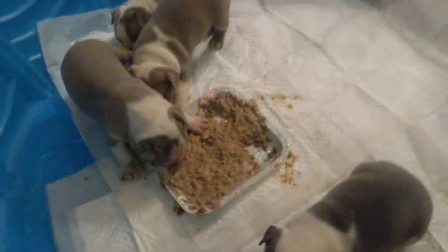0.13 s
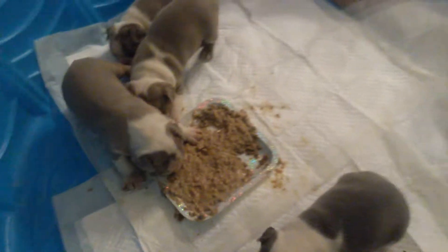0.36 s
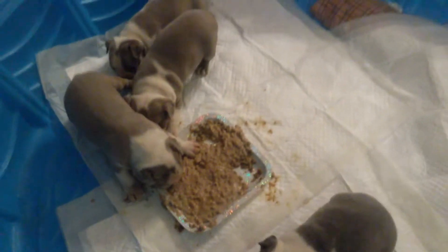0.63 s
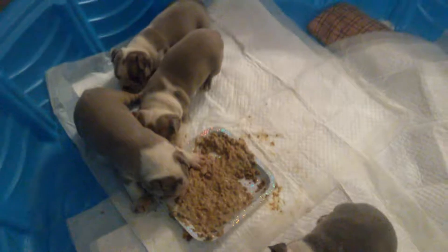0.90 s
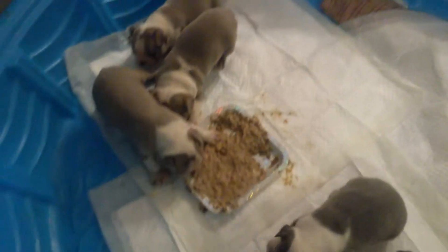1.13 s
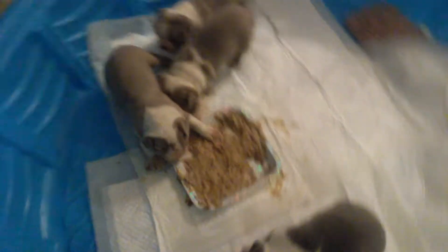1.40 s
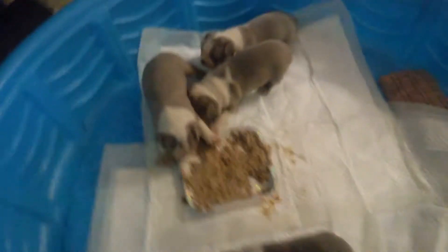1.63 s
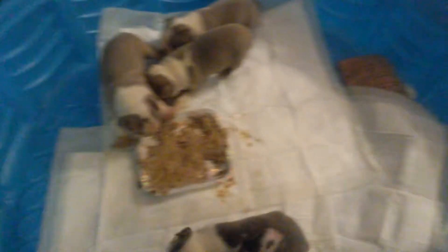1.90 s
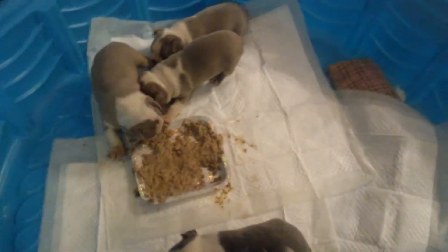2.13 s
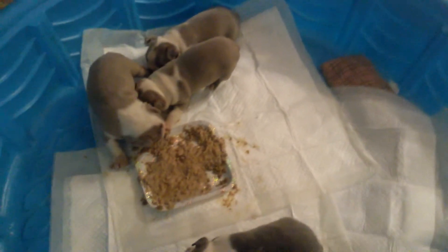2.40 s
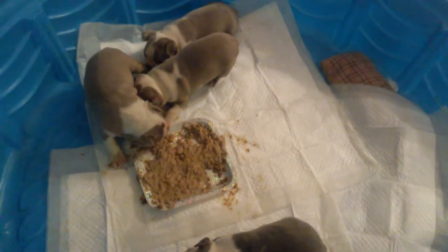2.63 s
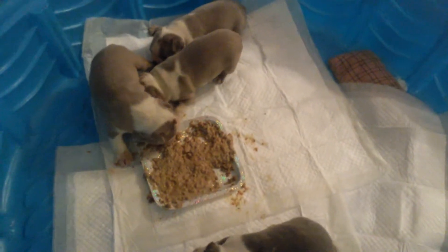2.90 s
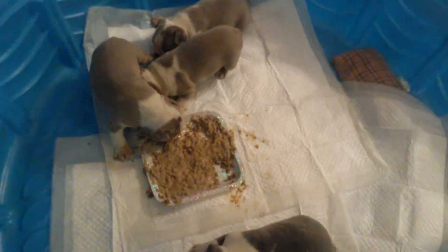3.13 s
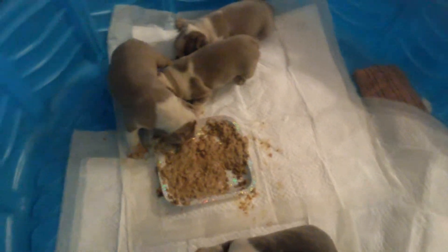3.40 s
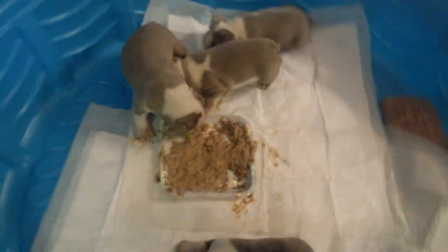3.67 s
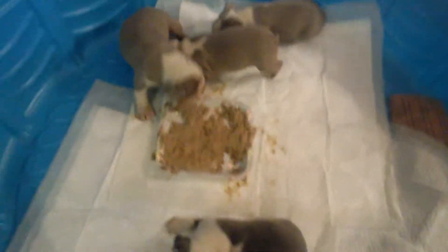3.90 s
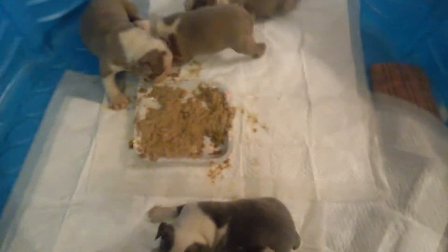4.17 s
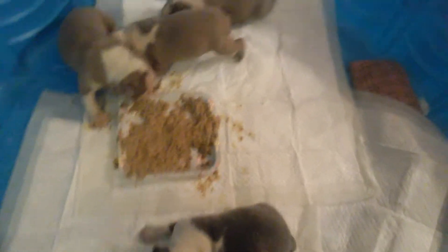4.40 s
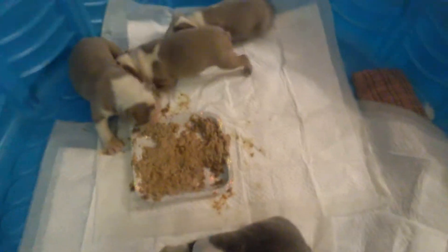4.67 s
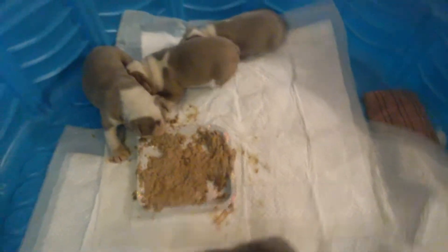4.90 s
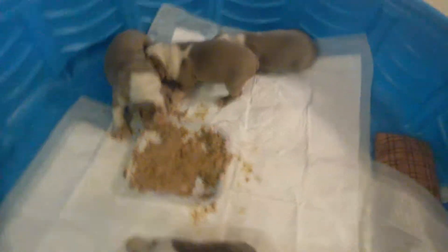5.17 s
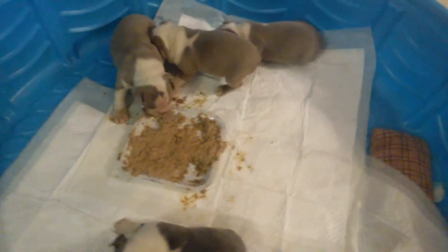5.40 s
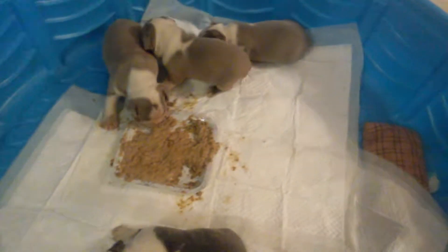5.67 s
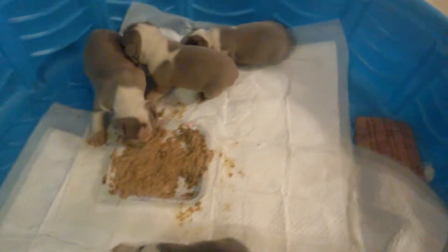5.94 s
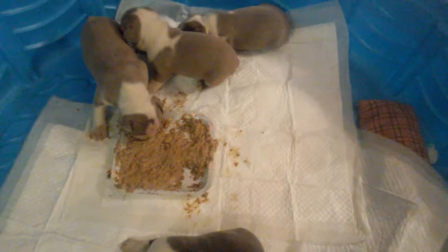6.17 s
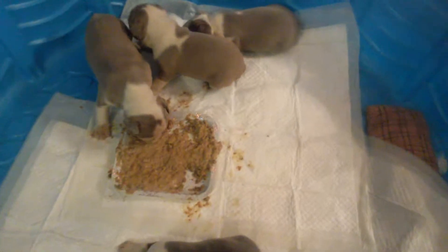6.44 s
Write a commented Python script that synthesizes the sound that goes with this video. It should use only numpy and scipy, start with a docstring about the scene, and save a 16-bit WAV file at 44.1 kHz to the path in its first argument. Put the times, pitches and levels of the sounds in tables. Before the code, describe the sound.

Quick plaintive puppy whimpers and one sharper yelp ring lightly indoors over low hum, soft shuffling, tiny eating clicks and occasional paw thuds.

```python
"""Young puppies round a food tray in a plastic pen, in a bare room, close below a hand-held camera's two ports.
From the start: low room hum, shuffling, thin hiss and a faint steady tick, all shaped noise or wavering tones;
tongue clicks and lip smacks are short ringing bursts, then paws thud on the floor as decaying low swings.
From half a second come whimpers, gliding harmonic tones smeared by the room: plain ones, a yelp with
a second pup over it, round arches and a held whine, more plain ones, wavering cries, and faint last calls."""
import sys
import numpy as np
from scipy import signal
from scipy.fft import rfft, irfft, next_fast_len
from scipy.io import wavfile
from scipy.ndimage import uniform_filter1d, map_coordinates

SR = 44100
rng = np.random.default_rng(int(sys.argv[2]) if len(sys.argv) > 2 else 0)


def convert_level_to_amplitude(level_db):
    """Map a level in decibels to its linear amplitude factor."""
    exponent = np.asarray(level_db, float) / 20
    return 10 ** exponent


def file_out(sig):
    """Save sig as 16-bit WAV at sys.argv[1]."""
    # one column per channel
    cols = np.atleast_2d(sig).T
    # limit, then scale
    lim = np.clip(cols, -1, 1)
    pcm = np.round(lim * 32767).astype(np.int16)
    wavfile.write(sys.argv[1], SR, pcm)


N = 288855


def unit(x):
    """Scaled to rms 1."""
    return x / np.sqrt(np.mean(x ** 2) + 1e-20)


def along(points, hz):
    """Reads (freq_hz, value) points on a log frequency axis."""
    f, v = np.transpose(points)
    return np.interp(np.log(hz + 1), np.log(f + 1), v)


def wobble(rate, size=N):
    """A smooth random curve, rate knots a second."""
    knots = rng.standard_normal(int(size * rate / SR) + 4)
    return map_coordinates(knots, [np.arange(size) * rate / SR])


def filtered(x, response):
    """x times a complex response of frequency."""
    m = next_fast_len(N + SR // 2)
    spectrum = rfft(x, m) * response(np.fft.rfftfreq(m, 1 / SR))
    return irfft(spectrum, m)[..., :N]


def add(track, sound, s):
    """Mixes a sound into a track at time s."""
    part = track[..., round(s * SR):][..., :sound.shape[-1]]
    part += sound[..., :part.shape[-1]]


# Likeness of the noise at the two ports: freq_hz, correlation
PORT_LIKENESS = [(60, 0.92), (240, 0.73), (950, 0.36), (3770, -0.14), (15000, 0.0039)]


def rush(spectrum, patchy_db):
    """Stereo noise of rms 1 with patches of random gain in time and frequency."""
    z = signal.stft(rng.standard_normal((2, N)), nperseg=512)[2]
    field = uniform_filter1d(rng.standard_normal(z.shape[1:]), 6, 0)
    field = uniform_filter1d(field, 14, 1)
    pair = signal.istft(z * convert_level_to_amplitude(patchy_db * unit(field)), nperseg=512)[1][:, :N]

    def response(hz):
        # the angle between mid and side sets how alike the ports are
        turn = np.arccos(np.clip(along(PORT_LIKENESS, hz), -1, 1)) / 2
        return convert_level_to_amplitude(along(spectrum, hz)) * np.array([np.cos(turn), np.sin(turn)])

    mid, side = filtered(pair, response)
    return unit(np.array([mid + side, mid - side]))


# Decay of the bare room: freq_hz, t60_s
ROOM_DECAY = [(200, 0.31), (1000, 0.47), (1800, 0.51), (3000, .45), (8000, 0.44), (15000, 0.13)]


def room(x, length=.6):
    """Each frequency of the reverberation dies at its own speed; the two ports share much of it."""
    hz, t, z = signal.stft(rng.standard_normal((2, round(length * SR))), SR, nperseg=256)
    decay = convert_level_to_amplitude(-60 * t / along(ROOM_DECAY, hz)[:, None])
    shared, apart = signal.istft(z * decay, SR, nperseg=256)[1]
    tail = np.array([shared + .7 * apart, shared - .7 * apart])
    late = np.pad(x, (260, 0))[None]  # 260 samples before the tail begins
    return signal.fftconvolve(late, tail / np.linalg.norm(tail[0]), axes=1)


# Background levels, higher around the calls: start_s, hum_db, shuffle_db
BACKGROUND_LEVELS = [(0.0, -67, -77.5), (0.151, -63, -71.5), (0.64, -64, -77.5), (0.909, -64, -77),
                     (1.31, -55, -64), (1.518, -59.5, -66), (1.701, -53.5, -59.5), (1.88, -56, -63.5),
                     (2.15, -56.5, -62.5), (2.37, -59, -60), (2.6, -59, -70), (2.83, -56, -69.5),
                     (3.3, -57, -66.5), (3.67, -58, -66), (3.81, -58.5, -62.5), (4.081, -52, -59.5),
                     (4.41, -59, -65.5), (4.74, -58.5, -66), (5.099, -66.5, -80.5), (5.33, -59, -67.5),
                     (5.55, -66.5, -81), (5.72, -60, -71.5), (5.821, -61.5, -75.5), (6.04, -66.5, -81.5),
                     (6.55, -66, -84.5)]


def background_levels():
    """Hum and shuffle levels in dB, gliding from point to point."""
    s, *columns = np.transpose(BACKGROUND_LEVELS)
    return [np.interp(np.arange(N) / SR, s, column) for column in columns]


# Spectrum of the room hum: freq_hz, relative level_db per Hz
HUM_SPECTRUM = [(20, -27.5), (40, -5), (60, 1.5), (150, -7.5), (230, -8.5), (390, -13), (530, -13),
                (720, -24), (1200, -47.5)]
# Wavering tones in the hum: pitch_hz, level_db (peak, at the mean hum level)
HUM_TONES = [(53.8, -70), (118.4, -67), (177.6, -71)]


def room_hum(hum_db):
    """Low noise with unsteady level, and tones whose level and phase waver."""
    hum = convert_level_to_amplitude(hum_db + 1.4 * wobble(6) + 2.3 * wobble(25)) * rush(HUM_SPECTRUM, patchy_db=0.5)
    t = np.arange(N) / SR
    for hz, db in HUM_TONES:
        level = convert_level_to_amplitude(db + hum_db - hum_db.mean() + 2.8 * wobble(28.0))
        hum += level * np.sin(2 * np.pi * hz * t + 1.4 * wobble(7.0))
    return hum


# Spectrum of bodies moving on the pads: freq_hz, relative level_db per Hz
SHUFFLE_SPECTRUM = [(400, -23), (700, -4), (1200, -1), (1600, -7), (2300, -2.5), (3500, -10), (5000, -12),
                    (7000, -23.5), (9000, -47.5)]


def shuffling(shuffle_db):
    """Bodies shuffle on the pads: patchy noise with a fluttering level."""
    shuffle = convert_level_to_amplitude(shuffle_db + 1.9 * wobble(27)) * rush(SHUFFLE_SPECTRUM, patchy_db=2.0)
    return shuffle * convert_level_to_amplitude(1.6 * wobble(240))  # crinkling pads break the rustle into grains


# Spectrum of the thin hiss: freq_hz, relative level_db per Hz
HISS_SPECTRUM = [(3000, -26), (5500, -3), (7500, -1), (9300, -13), (11500, -5), (15800, -6.5)]


def thin_hiss(shuffle_db):
    """Patchy treble noise that swings wider than the shuffle."""
    hiss_db = -83.5 + 1.3 * (shuffle_db - shuffle_db.mean())
    return convert_level_to_amplitude(hiss_db) * rush(HISS_SPECTRUM, patchy_db=3.0)


def background():
    """Hum, shuffling and hiss, each at its moving level."""
    hum_db, shuffle_db = background_levels()
    return room_hum(hum_db) + shuffling(shuffle_db) + thin_hiss(shuffle_db)


def ticks(db=-74):
    """A faint treble tick at a steady pace: differenced noise under a short smooth window."""
    size, period_s = 70, .1025  # size in samples
    out = np.zeros((2, N))
    for s in np.arange(.06, N / SR, period_s):
        treble = np.diff(rng.standard_normal((2, size + 1)))
        add(out, convert_level_to_amplitude(db + rng.normal(0, 1)) * np.hanning(size) * treble, s)
    return out


def nibbling(count=70, base_db=-72):
    """Tiny scattered clicks of tongues in wet food, each a fast-dying sine."""
    out, t = np.zeros((2, N)), np.arange(SR // 200) / SR
    s, _, shuffle_db = np.transpose(BACKGROUND_LEVELS)
    for when, pitch, size, pan in rng.uniform(size=(count, 4)):
        start_s = when * N / SR
        # louder where the background swells
        swell_db = .4 * (np.interp(start_s, s, shuffle_db) - shuffle_db.mean())
        click = convert_level_to_amplitude(-60 * t / 0.0031) * np.sin(2 * np.pi * 1800 * 3 ** pitch * t)
        size_db = -7.9 * np.log(.12 + size)  # mostly faint, a few loud
        pan_db = np.array([[-6 * pan], [0]])
        add(out, convert_level_to_amplitude(base_db + swell_db + size_db + pan_db) * click, start_s)
    return out


# Lips smacking close to the ports: start_s, peak_db (before panning), pitch_hz, left_minus_right_db
LIP_SMACKS = [(0.114, -58, 2860, -11), (0.2512, -47.5, 2900, -19), (0.2626, -59, 2850, -23),
              (0.5921, -58, 2730, -14), (1.432, -51, 2570, -16), (2.1798, -37, 1980, -6),
              (2.666, -49, 2210, -15), (3.352, -51, 5500, -4), (3.869, -48.5, 4400, -7),
              (4.7716, -45.5, 2640, -10), (5.676, -50, 2062, -9.5), (6.4076, -61, 3070, -7.5),
              (6.4383, -56.5, 2940, -17)]


def smacks(wet_db=-8):
    """Wet lips part: a short crackle that rings the mouth."""
    out, t = np.zeros((2, N)), np.arange(SR // 30) / SR
    for s, db, hz, pan_db in LIP_SMACKS:
        crackle = rng.standard_normal(len(t)) * convert_level_to_amplitude(-60 * t / 0.0097)
        mouth = t * convert_level_to_amplitude(-60 * t / .0013) * np.sin(2 * np.pi * hz * t)
        ring = np.convolve(crackle, mouth)[:len(t)]
        smack = convert_level_to_amplitude(db) * ring / np.max(np.abs(ring))
        add(out, smack * convert_level_to_amplitude([[pan_db / 2], [-pan_db / 2]]), s)
        add(out, convert_level_to_amplitude(wet_db) * room(smack), s)
    return out


# Paws on the pen floor: start_s, push_db (before onset and panning), pitch_hz, t60_s
PAW_THUDS = [(0.186, -42.5, 97, 0.092), (0.414, -25.5, 169, 0.012), (0.422, -34.5, 113, 0.025),
             (1.992, -25, 193, 0.027), (2.879, -22.5, 299, 0.019), (4.601, -28, 170.3, 0.068),
             (5.088, -42, 176.6, 0.049)]
# Claw taps on the same floor: start_s, peak_db
CLAW_TAPS = [(.4165, -45), (.4237, -48)]


def thuds(wet_db=-9):
    """A paw pushes the thin floor, which swings a few low cycles; claws tap as single short pulses."""
    out, t = np.zeros((2, N)), np.arange(SR // 4) / SR
    for s, db, hz, t60 in PAW_THUDS:
        swing = np.sin(2 * np.pi * hz * t)
        swing += 0.14 * np.sin(2 * np.pi * 2.4 * hz * t + rng.uniform(0, 2 * np.pi))
        thud = convert_level_to_amplitude(db - 60 * t / t60) * (1 - np.exp(-t / 0.0032)) * swing
        add(out, thud * convert_level_to_amplitude([[-1.5], [1.5]]), s)  # a little to the right
        add(out, convert_level_to_amplitude(wet_db) * room(thud), s)
    for s, db in CLAW_TAPS:
        add(out, -convert_level_to_amplitude(db) * np.exp(-((t - .0006) / .00018) ** 2 / 2), s)
    return out


def plain_glide(start, length, start_hz, crest_hz, db):
    """Time, pitch, level, fundamental's dip and mouth opening of a plain whimper.

    A short one is a single glide from start to crest pitch; a longer one also falls after the crest."""
    t = np.arange(0, length, 1 / SR)
    hold_s = .012  # the pitch waits before gliding
    crest = min(.074, length)  # a short call ends at its crest
    up = np.sin(np.pi / 2 * np.clip((t - hold_s) / (crest - hold_s), 0, 1)) ** 1.5
    down = (np.clip(t - crest, 0, 1) / max(length - crest, 1 / SR)) ** 1.8  # the fall starts slowly
    fall_to = .72  # last pitch over crest pitch
    hz = start_hz + (crest_hz - start_hz) * up - (1 - fall_to) * crest_hz * down
    soft_start_db = -10.5 * np.exp(-t / 0.017)
    gasp_db = 8.5 * np.exp((t - length) / 0.0053)  # a last push as the breath stops
    dip_db = -15.5 * np.exp(-((t - .076) / 0.011) ** 2)  # the fundamental sinks near the crest
    return start + t, hz, db + soft_start_db + gasp_db, dip_db, 0 * t


def free_cry(rows):
    """The same controls for a freer pitch path; overtones follow a smoothed level, not the quick dips."""
    s, *columns = np.transpose(rows)
    t = np.arange(s[0], s[-1], 1 / SR)
    hz, db, opening = [uniform_filter1d(np.interp(t, s, c), size=221, mode="nearest") for c in columns]
    smooth_db = uniform_filter1d(db, size=1800, mode="nearest")
    return t, hz, smooth_db, db - smooth_db, np.clip(opening, 0, 1)


# Second harmonic with the mouth closed: freq_hz, level_db over the voice
SECOND_HARMONIC = [(1600, -14.5), (1900, -15), (2200, -14), (2500, -17), (2900, -16)]
# Third harmonic with the mouth not wide open: freq_hz, level_db over the second
THIRD_HARMONIC = [(2200, -4), (2800, -12), (3400, -30), (4000, -30), (4400, -20)]
# Upper harmonics grow as the pitch rises: pitch_hz, level_db over the voice
PITCH_BRIGHTNESS = [(800, -38.5), (950, -39.5), (1150, -27.5), (1290, -22.5), (1380, -20.5), (1500, -13)]
# Colour of the upper harmonics through the nose: freq_hz, relative level_db
NOSE_COLOUR = [(2000, -11.5), (3500, -12.5), (4600, -29), (5300, -38), (5900, -28), (6500, -12.5),
               (7800, -10), (9200, -32.5), (11000, -11.5), (12600, -30), (15500, -37.5)]
# Colour of the upper harmonics through an open mouth: freq_hz, relative level_db
MOUTH_COLOUR = [(2000, -25.5), (4200, -5), (5700, 3.5), (7100, -2.5), (8600, -15), (10000, -22),
                (11500, -17), (15500, -31)]


def whimper(t, hz, db, dip_db, opening, jitter=.004, shimmer_db=1, breath_db=-25, rise=.003, fall=.007):
    """Vocal folds sound harmonics of the pitch; nose and opening mouth colour them."""
    size = len(t)
    hz = hz * (1 + jitter * wobble(90, size))
    k = np.arange(1, 19)[:, None]  # harmonic numbers
    second_db = along(SECOND_HARMONIC, 2 * hz) + 3 * wobble(90, size)
    second_db += 14.5 * np.sin(np.pi / 2 * np.clip(3 * opening, 0, 1))
    upper_db = along(PITCH_BRIGHTNESS, hz) + 23 * opening
    mouth = np.clip(2 * opening - 1, 0, 1)  # from nose to mouth colour
    upper = convert_level_to_amplitude((1 - mouth) * along(NOSE_COLOUR, k * hz) + mouth * along(MOUTH_COLOUR, k * hz))
    upper *= k * hz < SR / 2.6
    gains = upper * convert_level_to_amplitude(upper_db) / np.sqrt(np.sum(upper[3:10] ** 2, axis=0))
    gains[0], gains[1] = convert_level_to_amplitude(dip_db), convert_level_to_amplitude(second_db)
    third = convert_level_to_amplitude(second_db + along(THIRD_HARMONIC, k[2] * hz))
    gains[2] = mouth * gains[2] + (1 - mouth) * third
    gains *= convert_level_to_amplitude(shimmer_db * np.sqrt(k) * np.array([wobble(110, size) for _ in k]))
    phase = 2 * np.pi * np.cumsum(hz) / SR
    tone = np.sqrt(2) * np.sum(gains * np.sin(k * phase + 0.15 * k ** 2), axis=0)
    # turbulent air roughens every harmonic a little
    tone *= 1 + convert_level_to_amplitude(breath_db) * wobble(900, size)
    # the voice rasps more as the breath runs out
    spent = (t - t[0]) / (t[-1] - t[0])
    tone *= convert_level_to_amplitude(1.6 * spent ** 2 * wobble(260, size))
    edges = np.clip((t - t[0]) / rise, 0, 1) * np.clip((t[-1] - t) / fall, 0, 1)
    return convert_level_to_amplitude(db) * edges * tone


# Shading of the direct sound: freq_hz, left_minus_right_db
BODY_SHADING = [(200, 0.5), (700, 1), (1300, -5.5), (2400, -5), (6000, -2.5), (14000, 5.5)]
# Lead of the left port over the right: freq_hz, phase_rad
LEFT_LEAD = [(300, .1), (900, .5), (1400, 1.0), (2400, 1.4), (5500, 1.8), (9000, 1.6), (14000, 1.9)]


def ports(x):
    """Direct sound reaches the left port first and is shaded by the camera body."""
    side = np.array([[.5], [-.5]])

    def response(hz):
        return convert_level_to_amplitude(side * along(BODY_SHADING, hz)) * np.exp(1j * side * along(LEFT_LEAD, hz))

    return filtered(x, response)


# Plain whimpers: short ones are a single glide, longer ones rise and fall:
# start_s, length_s, start_hz, crest_hz, level_db (before soft start and gasp)
PLAIN_WHIMPERS = [(0.549, 0.058, 815, 911, -58), (0.815, 0.062, 914, 958.4, -44.5),
                  (1.064, 0.064, 880, 1100, -40), (1.231, 0.034, 1080, 1430, -56.5),
                  (1.243, .057, 946, 1149, -46), (1.298, 0.041, 892, 969, -34),
                  (2.048, 0.073, 898, 1176, -35), (2.279, 0.077, 893, 1156, -37),
                  (3.226, 0.17, 960, 1330, -35), (3.57, .141, 867, 1296, -36),
                  (3.875, 0.12, 886, 1179, -36), (4.157, 0.13, 880, 1282, -36),
                  (4.449, 0.12, 882, 1126, -36), (5.641, .042, 1005, 942, -50),
                  (6.533, 0.026, 1091, 1090, -63.5)]
# Cries with a freer pitch path: a yelp, a second pup over it, two round arches, a held whine,
# three wavering ones. Each is a list of points: time_s, pitch_hz, level_db, mouth_opening (0-1)
FREE_CRIES = [
    [(1.475, 998.5, -44, .2), (1.487, 997, -45, .1), (1.505, 1337, -29.5, 0), (1.516, 1412, -35, 0.96),
     (1.53, 1451, -24.5, 0.89), (1.548, 1434, -37, 0.81), (1.562, 1392, -31, 1), (1.573, 1384, -27.5, 0.96),
     (1.583, 1352, -30.5, .9), (1.6, 1196, -37, 0.1), (1.631, 968, -43, 0.6), (1.709, 920, -39, 0.4),
     (1.739, 730.5, -52, 0.6), (1.757, 874, -46, .3), (1.778, 855, -41.5, 0.4)],
    [(1.49, 961, -31, 0), (1.52, 1186, -37.5, 0.19), (1.56, 1516, -45, 0), (1.6, 1566, -43, 0.06),
     (1.63, 1642, -44, 0)],
    [(1.765, 1052, -39, 0.07), (1.792, 1263, -31, 0.07), (1.804, 1322, -37.5, 0.02),
     (1.825, 1436, -36.5, 0.11), (1.84, 1475, -36, 0.07), (1.867, 1445, -39, 0.04), (1.88, 1414, -46, 0),
     (1.892, 1280, -33.5, 0.05), (1.902, 1120, -31.5, 0.12)],
    [(2.53, 892, -53, 0), (2.548, 961, -39, 0.17), (2.569, 1104, -34.5, 0), (2.587, 1268, -34, 0.14),
     (2.608, 1332, -48, 0.02), (2.632, 1336, -42, 0.04), (2.65, 1263, -38, 0.08), (2.668, 1217, -35, 0),
     (2.689, 1007, -37, 0.13)],
    [(2.832, 986, -50, 0.04), (2.847, 995.6, -40, 0.09), (2.883, 1288, -34, 0.09), (2.904, 1374, -50.5, 0),
     (2.94, 1331, -37, 0.08), (2.979, 1294, -34.5, 0), (3.03, 1316, -39, 0.14), (3.045, 1254, -32.5, 0),
     (3.06, 1038, -41.5, .1)],
    [(4.762, 912, -41.5, 0), (4.795, 851.6, -42, 0.08), (4.819, 1016, -41.5, 0), (4.834, 1004, -34, 0)],
    [(5.047, 948, -50, 0), (5.083, 831.5, -44.5, 0.03), (5.116, 1003, -43.5, 0), (5.137, 846, -43.5, 0.01)],
    [(5.335, 956, -47, 0), (5.344, 1031, -49, 0), (5.362, 863, -41, 0.02), (5.392, 839, -46, 0.06)],
]
# Distinct wall echoes: delay_s, level_db (before absorption), left_minus_right_db
WALL_ECHOES = [(.0155, -12, 3), (.033, -16, -4), (.05, -16, 2)]
# Pads and bodies absorb reflected treble: freq_hz, gain_db
SOFT_ABSORPTION = [(1000, -1.5), (2000, -0.5), (3000, -1), (5000, -3.5), (12000, -3.5)]


def puppies(direct_db=-.7, wet_db=-11.5):
    """Every whimper, straight to the ports and back from the walls."""
    direct, walls = np.zeros(N), np.zeros((2, N))
    calls = [plain_glide(*row) for row in PLAIN_WHIMPERS] + [free_cry(rows) for rows in FREE_CRIES]
    for controls in calls:
        start_s = controls[0][0]
        voice = whimper(*controls)
        add(direct, voice, start_s)
        add(walls, room(voice), start_s)
    for delay, db, pan_db in WALL_ECHOES:
        echo_db = db - wet_db  # wet_db is applied to all reflections below
        add(walls, direct * convert_level_to_amplitude([[echo_db + pan_db / 2], [echo_db - pan_db / 2]]), delay)
    reflected = filtered(walls, lambda hz: convert_level_to_amplitude(along(SOFT_ABSORPTION, hz)))
    return convert_level_to_amplitude(direct_db) * ports(direct) + convert_level_to_amplitude(wet_db) * reflected


def scene():
    """All sources at the two microphone ports."""
    return background() + ticks() + nibbling() + smacks() + thuds() + puppies()


# Treble of the microphone, a small dip and then a lift: freq_hz, gain_db
MIC_TREBLE = [(8300, 0), (9400, -1), (10200, 2.5)]


def low_pass(x):
    """Removes everything above the highest recorded frequency."""
    return signal.sosfilt(signal.butter(12, 15930, fs=SR, output="sos"), x)


def record(dry):
    """The hand-held microphone colours the treble of the whole mix."""
    mix = filtered(dry, lambda hz: convert_level_to_amplitude(along(MIC_TREBLE, hz)))
    return low_pass(mix)


dry = scene()
out = record(dry)
file_out(out)
```